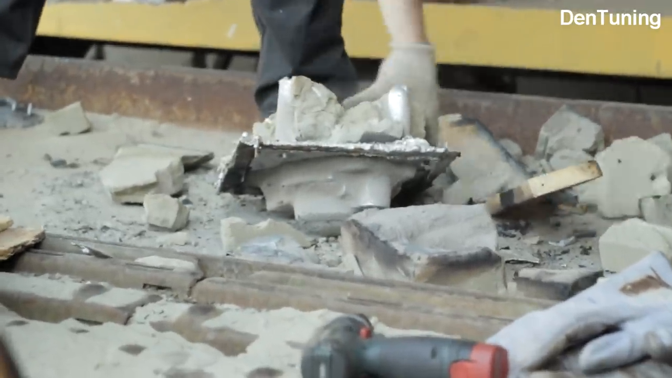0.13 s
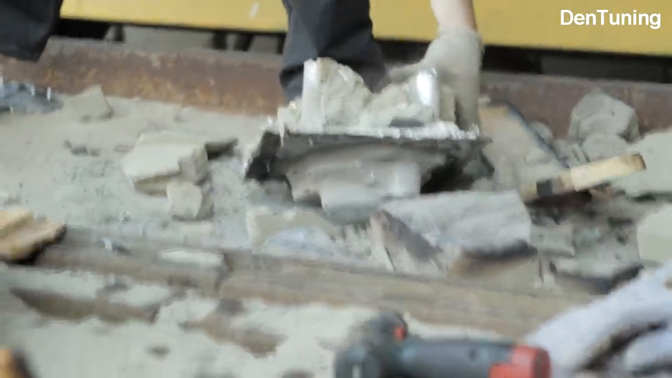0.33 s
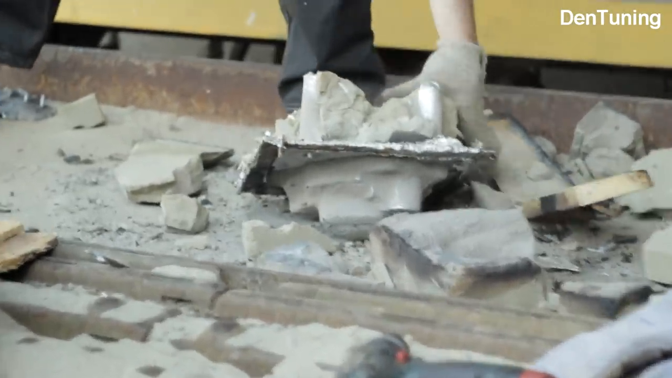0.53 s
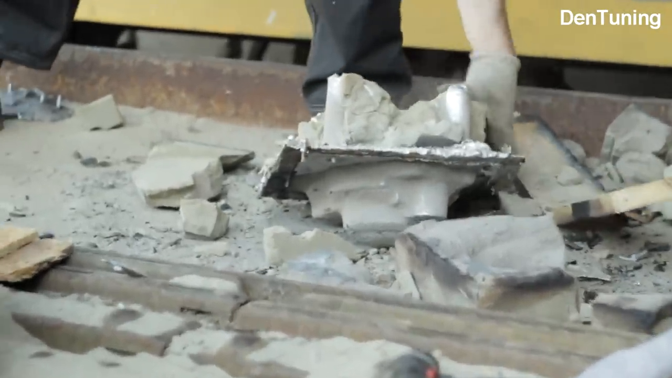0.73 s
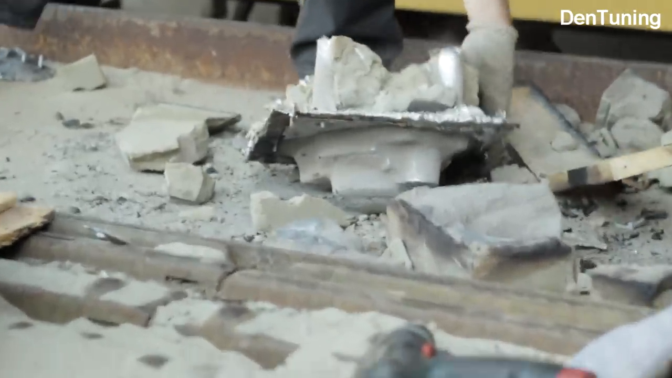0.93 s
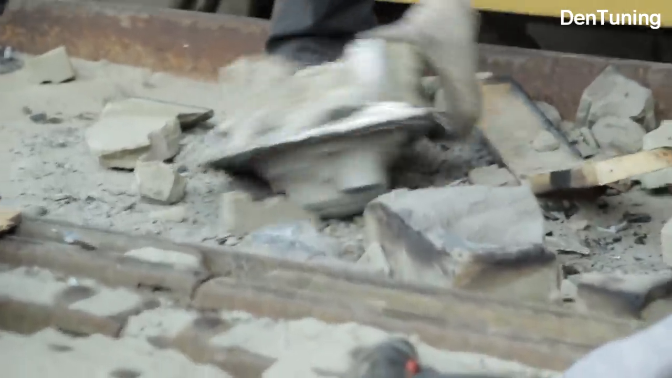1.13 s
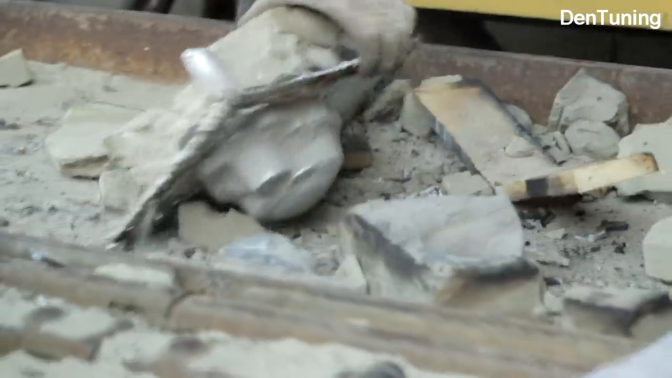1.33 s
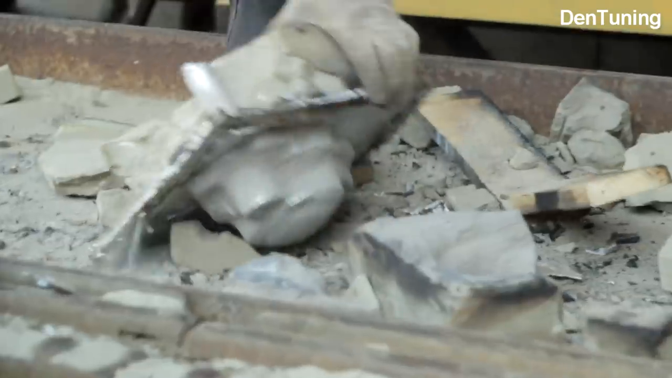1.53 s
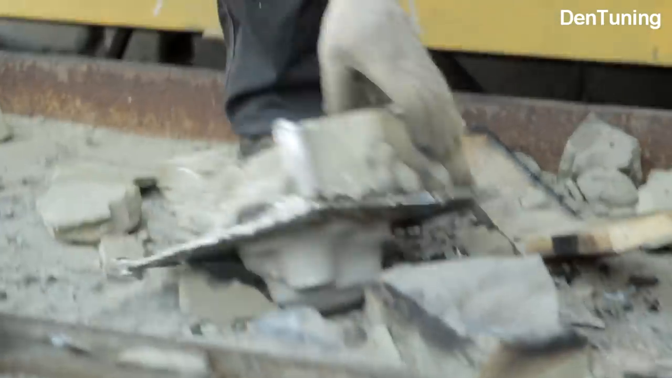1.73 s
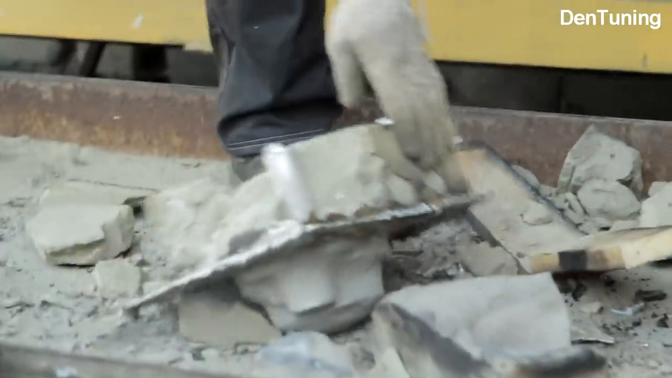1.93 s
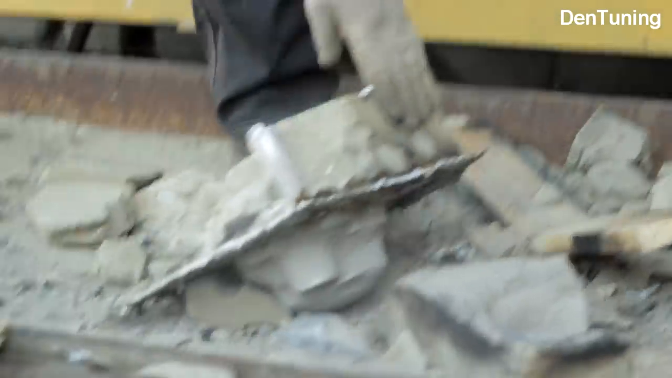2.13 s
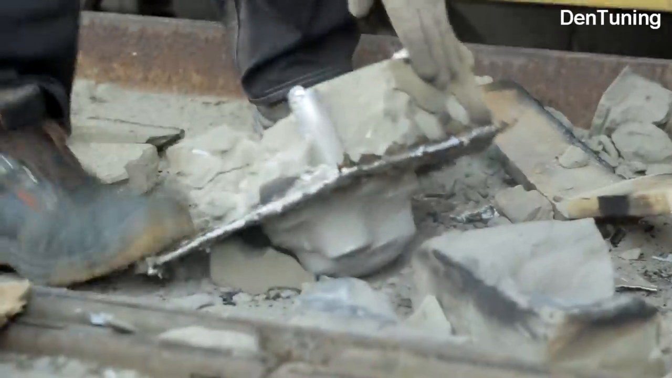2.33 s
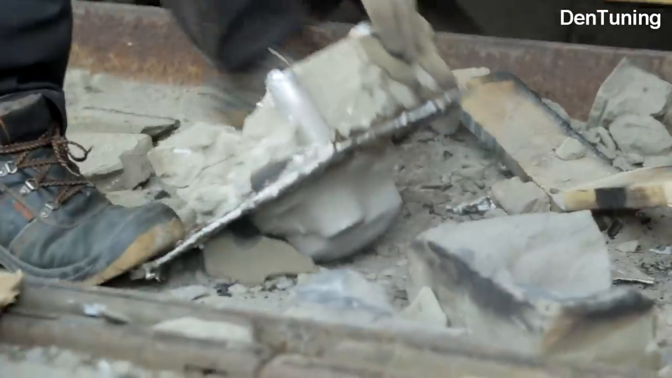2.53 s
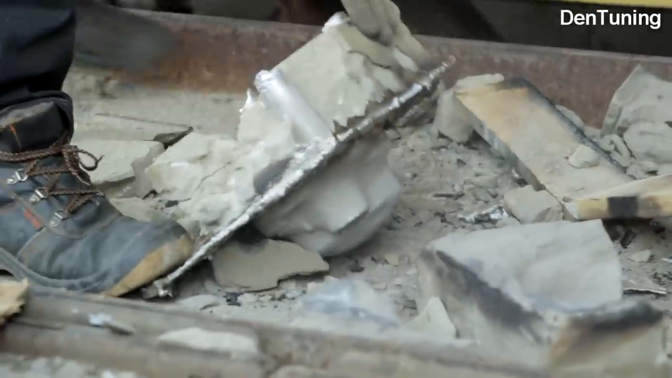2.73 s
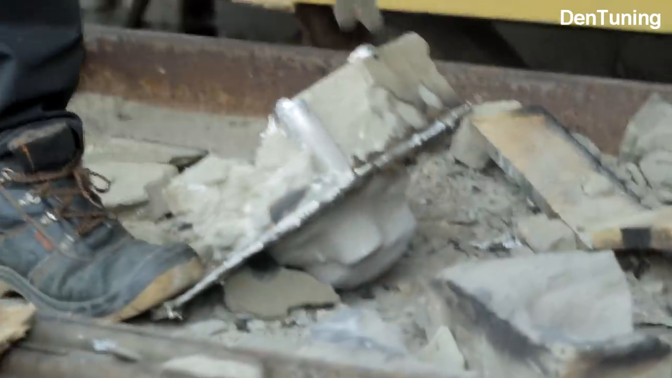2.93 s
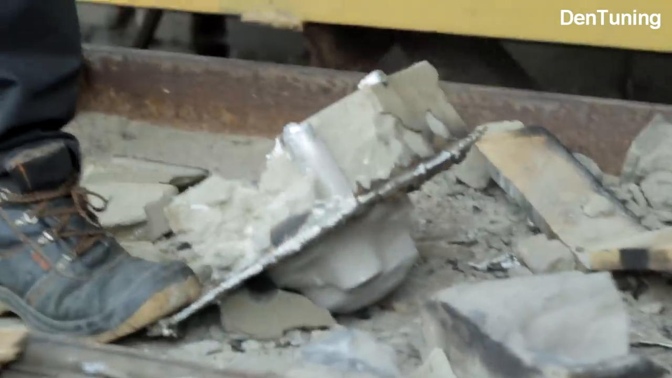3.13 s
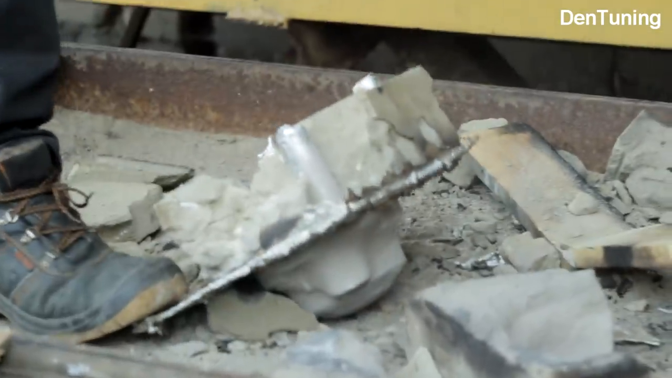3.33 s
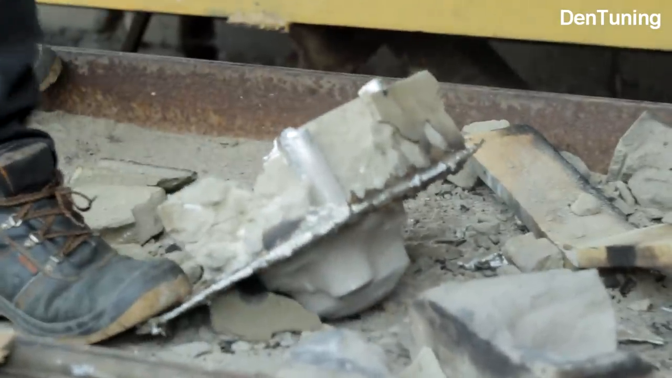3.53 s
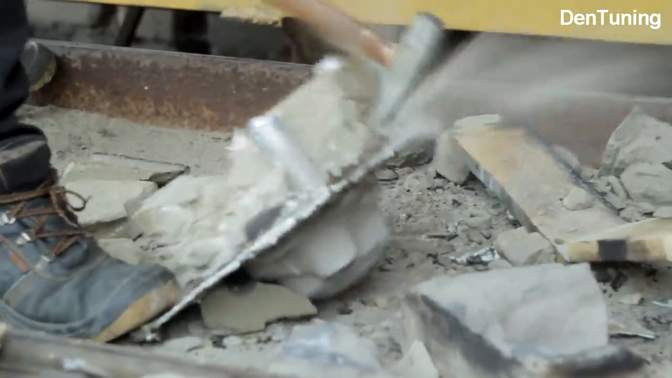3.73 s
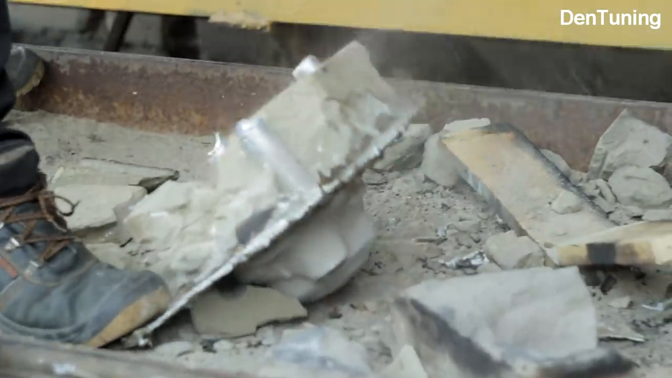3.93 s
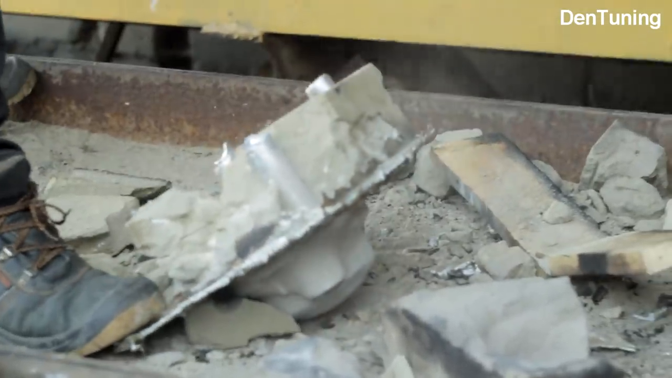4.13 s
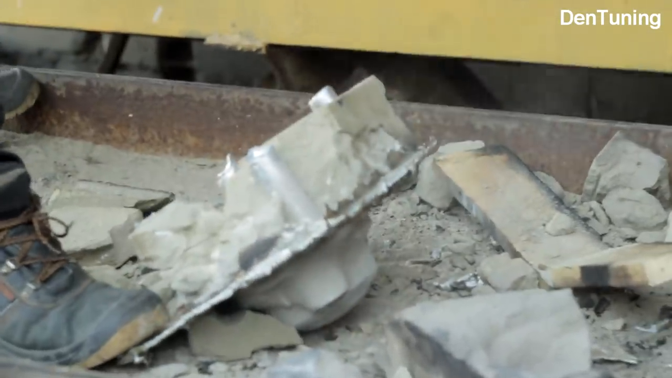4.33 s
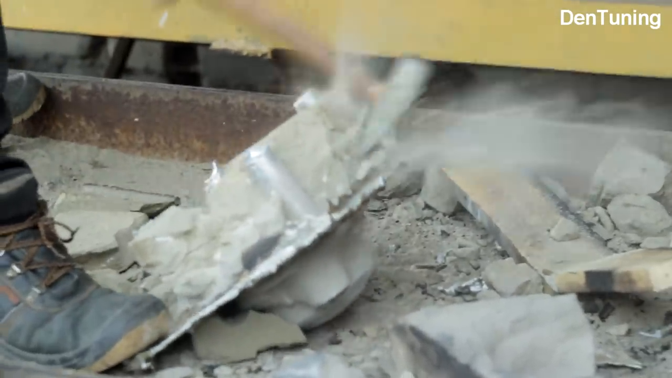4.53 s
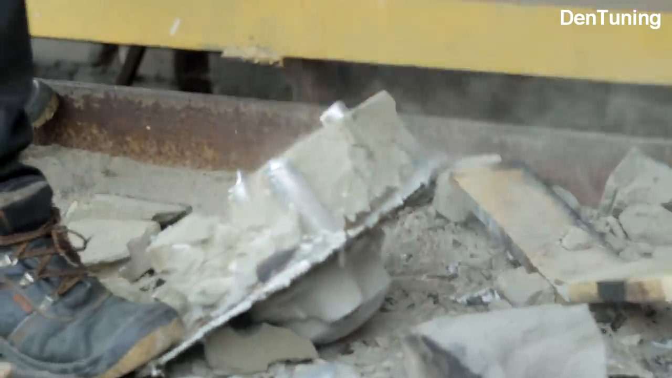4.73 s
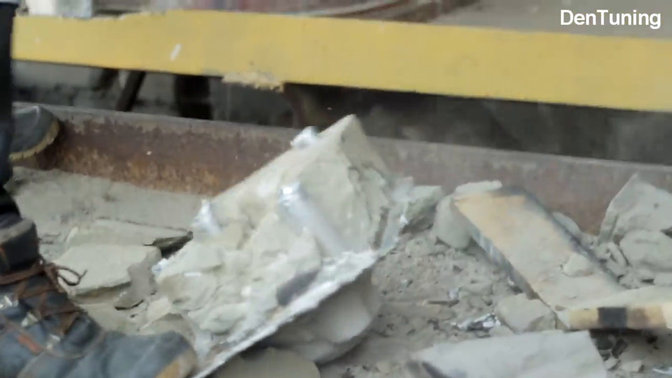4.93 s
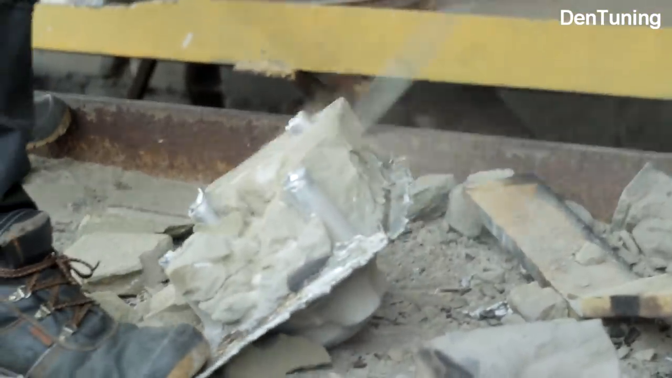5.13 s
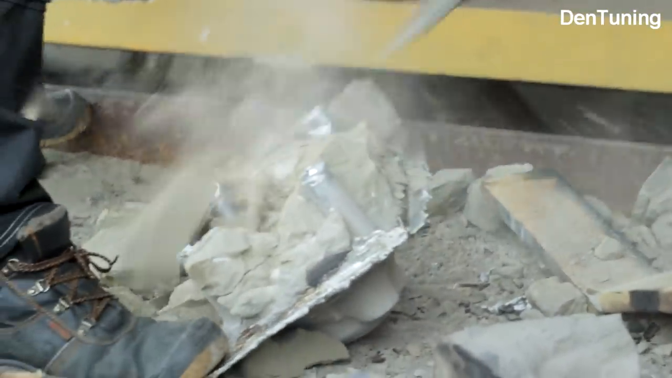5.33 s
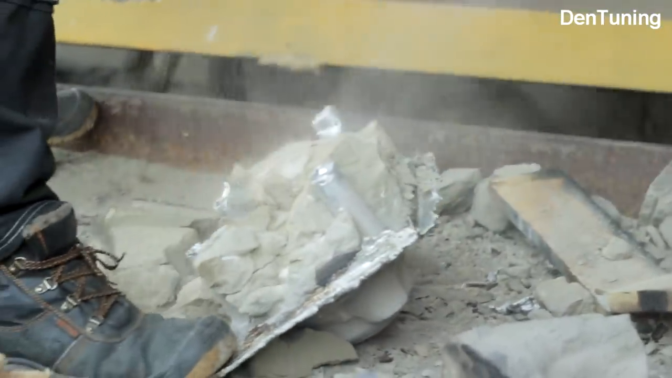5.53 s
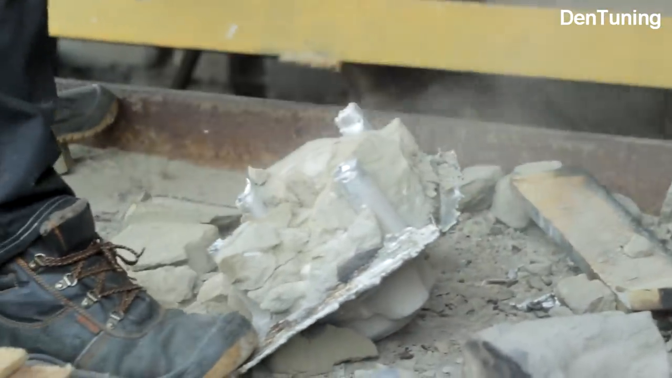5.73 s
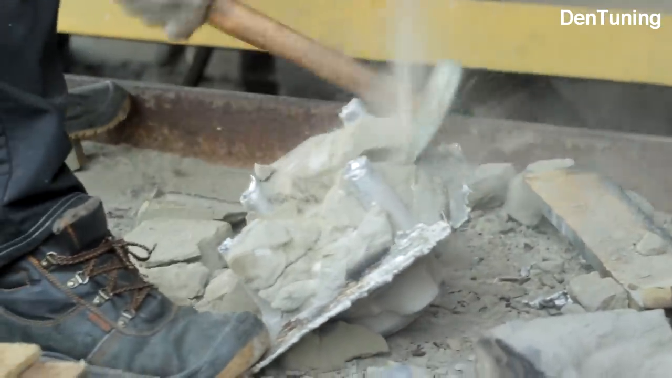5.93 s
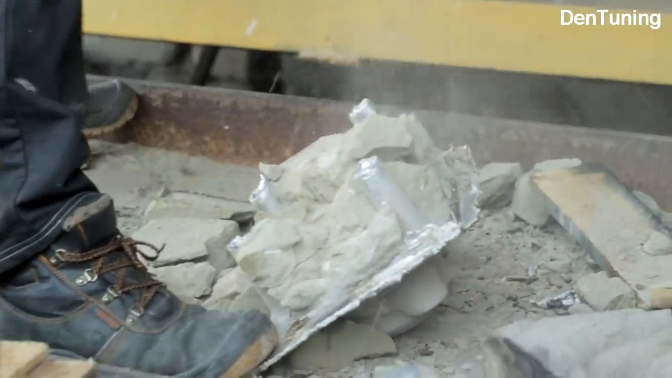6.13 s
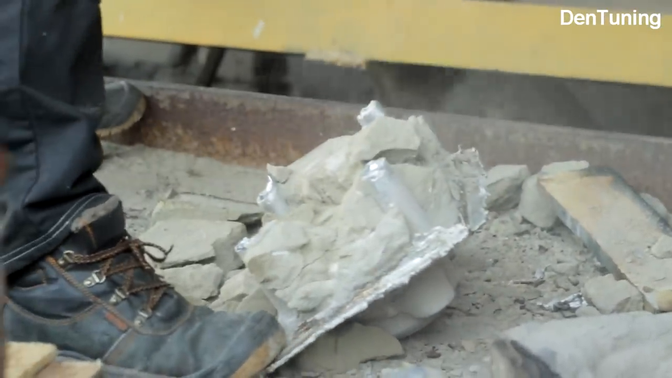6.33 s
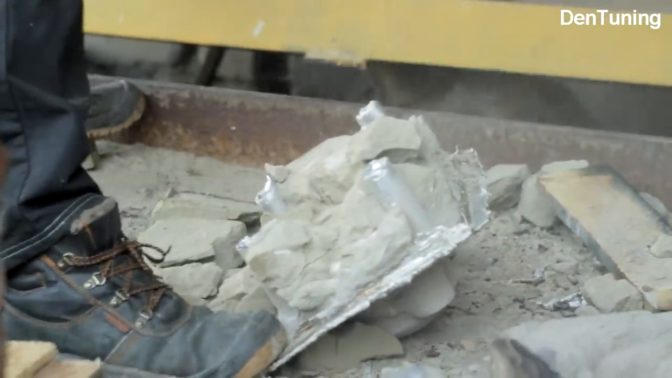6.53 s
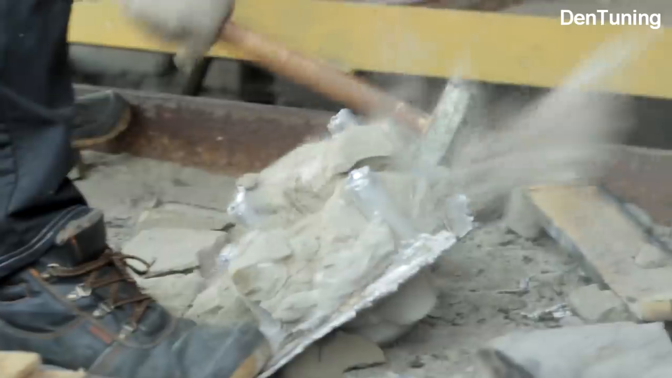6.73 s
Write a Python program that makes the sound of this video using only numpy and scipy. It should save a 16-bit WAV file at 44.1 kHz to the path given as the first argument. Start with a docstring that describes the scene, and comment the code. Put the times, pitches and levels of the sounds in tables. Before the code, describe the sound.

Gritty scraping and stony knocks, a short lull, then five spaced hammer thuds with bursts of crushed sand, ticking chips and yard echoes.

```python
"""Hammering a casting out of its sand mould

A metal casting in its hardened sand mould is tipped over on gritty ground, then struck five times with a hammer.
Each blow is a burst of crushed sand, a low thud and ringing modes, with echoes from the steel and walls of a yard.
Grinding sums filtered random grains; lumps, chips and the casting's rim knock as clicks with dying sines.
Soft deep bumps, one swish of cloth and steady background noise complete the scene."""
import sys
import numpy as np
from scipy import signal
from scipy.io import wavfile

SR = 44100
rng = np.random.default_rng(int(sys.argv[2]) if len(sys.argv) > 2 else 0)


def inscribe(sig):
    """Save sig as 16-bit PCM at rate SR to the path in sys.argv[1].

    A 1-D sig is mono; a 2-D sig holds one channel per row.
    Samples are clipped to [-1, 1] before scaling.
    """
    pcm = np.round(np.clip(np.atleast_2d(sig).T, -1, 1) * 32767)
    wavfile.write(sys.argv[1], SR, pcm.astype(np.int16))


N = 298998
EDGE_HZ = 16000  # upper band limit


def amp(db):
    """Level law: decibels become a linear gain."""
    return 10 ** (np.asarray(db) / 20)


def evened(x):
    """Power normalization: scales a signal to rms 1."""
    return x / np.sqrt(np.mean(x ** 2) + 1e-20)


def read(points, hz):
    """Logarithmic frequency scale: interpolates (Hz, value) points along it."""
    f, value = np.transpose(points)
    return np.interp(np.log(hz + 1), np.log(f + 1), value)


def add(mix, s, sound):
    """Superposition: adds a sound into the mix at time s."""
    part = mix[max(round(s * SR), 0):][:len(sound)]
    part += sound[:len(part)]


def pulse(*spectra, size=4096):
    """Minimum phase: the most compact causal click with the summed (Hz, dB) spectra."""
    hz = abs(np.fft.fftfreq(size, 1 / SR))
    log_gain = np.log(amp(sum(read(points, hz) for points in spectra)))
    # the Hilbert transform of the log gain gives the phase
    spectrum = np.exp(np.conj(signal.hilbert(log_gain)))
    return np.fft.ifft(spectrum).real[:size // 2]


def ring(modes, t):
    """Modal superposition: (Hz, dB, t60 s) modes die exponentially, each from a random phase."""
    return sum(amp(db - 60 * t / t60) * np.sin(2 * np.pi * (hz * t + rng.random()))
               for hz, db, t60 in modes)


def uneven(depth_db, count=34):
    """Random fracture: a hilly spectrum above the bass, since no two lumps break alike."""
    hills_db = depth_db * rng.standard_normal(count)
    hills_db = hills_db * (np.arange(count) > 0)  # the lowest point stays level
    return list(zip(np.geomspace(350, 16000, count), hills_db))


def grains(per_s, spread_db, count):
    """Shot noise: clicks at random times and signs, most small and a few large."""
    at = rng.integers(0, count, round(per_s * count / SR))
    size = amp(spread_db * np.minimum(rng.exponential(1, len(at)), 4))
    return np.bincount(at, size * rng.choice([-1, 1], len(at)), count)


def crumble(fade):
    """Granular fracture: a dense burst of energy 1, fading with a time constant in s."""
    burst = grains(per_s=6000, spread_db=3, count=SR) * np.exp(-np.arange(SR) / SR / fade)
    # grains are too small to radiate bass
    burst = signal.sosfilt(signal.butter(2, 700, "high", fs=SR, output="sos"), burst)
    return burst / np.linalg.norm(burst)


def tail(t60s, rise, size=256):
    """Diffuse reverberation: noise of energy 1 builds up, then dies at a rate set by frequency."""
    hz, t, z = signal.stft(rng.standard_normal(SR), SR, nperseg=size)
    fall_db = -60 * t / read(t60s, hz)[:, None]
    x = signal.istft(z * amp(fall_db), SR, nperseg=size)[1][:SR]
    x *= 1 - np.exp(-np.arange(SR) / SR / rise)
    return x / np.linalg.norm(x)


# Reflections from near surfaces: nominal delay_s, relative gain [ratio]
ECHOES = [(.0064, 0.5), (0.0103, 0.23), (0.014, -0.23), (.0173, 0.23), (.0266, .32), (.0336, .27)]
# Decay of the scatter from nearby stock: frequency_hz, t60_s
NEAR_T60 = [(100, 0.49), (300, 0.45), (1000, 0.31), (3000, 0.25), (7000, 0.24), (15000, 0.16)]
# Decay of the long tail of the yard: frequency_hz, t60_s
FAR_T60 = [(100, 1.52), (400, 0.75), (2000, 0.8), (6000, 0.67), (15000, 0.81)]


def yard(echo_db, near_db, far_db):
    """Impulse response: direct sound, single echoes, scatter from nearby stock and a long tail."""
    near = amp(near_db) * tail(NEAR_T60, rise=0.0092)
    far = amp(far_db) * tail(FAR_T60, rise=0.023)
    response = near + far
    response[0] += 1
    for s, gain in ECHOES:
        echo = amp(echo_db) * gain * np.array([1, 2, 1]) / 4  # slightly dulled
        add(response, s * rng.normal(1, .012), echo)
    return response


# Spectrum of the background: frequency_hz, relative level_db
AIR = [(20, 0.5), (50, -8), (120, -9), (400, -6.5), (850, -11), (1500, -12), (5000, -21.5), (15500, -28)]
AIR_DB = -71.5  # rms level


def air():
    """Stationary noise: a quiet background of constant power and fixed colour."""
    noise = signal.fftconvolve(rng.standard_normal(N), pulse(AIR))[:N]
    return amp(AIR_DB) * evened(noise)


PATCH_S, PATCH_DB = .03, 2.5  # spacing of the random gain points; their standard deviation


def clusters(count=500):
    """Random modulation: crumbs of neighbouring sizes come and go in clusters."""
    gain = amp(PATCH_DB * rng.standard_normal(count))
    return np.interp(np.arange(N) / SR, np.arange(count) * PATCH_S, gain)


# Spectrum of the larger bursting grains: frequency_hz, relative level_db
CRACKLE_COLOUR = [(100, -18), (500, -9), (1300, 2.5), (2500, -7), (6000, -13), (15000, -22.5)]
CRACKLE_PER_S, CRACKLE_SPREAD_DB = 160, 3  # bursts per second; scale of their size range


def crackle(per_s, count=8):
    """Filtered shot noise: larger grains burst with sharp clicks, each kind in its own colour."""
    total = np.zeros(N)
    for _ in range(count):
        bursts = grains(per_s / count, CRACKLE_SPREAD_DB, count=N)
        colour = pulse(CRACKLE_COLOUR, uneven(depth_db=5.5))
        total += signal.oaconvolve(bursts, colour)[:N]
    return evened(signal.oaconvolve(total, yard(echo_db=-13, near_db=-11, far_db=-12))[:N])


# The casting grinding over grit, or loose sand sliding:
# start_s, rise_s, hold_s, fade_db_per_s, relative level_db,
# coarse_db and fine_db (crumbs relative to the medium ones)
GRINDS = [(0.0, 0.007, 0.022, 80, -55, -3, -15), (0.263, 0.0092, 0.013, 116, -66.5, 3.5, -0.5),
          (0.537, .01, 0.033, 73, -69.5, -0.5, -9), (0.798, 0.064, 0.016, 139, -70, -4, -23),
          (1.136, 0.1, 0.18, 139, -48, -3, -9), (1.332, 0.048, 0.13, 149, -52.5, 8.5, -9.5),
          (1.547, 0.16, 0.06, 118, -50, 0, -11.5), (1.885, 0.045, 0.048, 60, -67, -3, -0.5),
          (1.997, 0.013, 0.024, 99, -61, 3, -3), (2.082, 0.042, 0.016, 169, -52, 3, -9),
          (2.182, 0.042, 0.14, 100, -63.5, 4, -9.5), (2.381, 0.013, 0.066, 150, -53.5, -15, -3.5),
          (2.416, 0.043, 0.088, 123, -50.5, -0.5, -10), (2.609, 0.034, 0.047, 104, -58, 3.5, -9),
          (2.886, 0.024, 0.037, 67, -61.5, -2.5, -8), (3.086, 0.078, .1, 92, -70.5, -21, -4),
          (3.265, 0.063, .03, 101, -59.5, -10, -2), (3.435, 0.029, 0.0066, 164, -70, 6.5, 3),
          (3.666, 0.053, 0.056, 80, -69.5, 3.5, -14), (4.016, 0.044, 0.06, 39, -64, -15, -4),
          (4.669, 0.065, 0.025, 92, -59.5, -10, -6), (4.838, 0.018, .1, 118, -57, -1.5, -4.5),
          (4.869, 0.16, 0.033, 162, -46.5, -7, -9.5), (5.136, .05, 0.063, 80, -61, -1, -8.5),
          (5.308, 0.047, 0.018, 44, -53.5, -5, -6), (5.458, .012, .03, 220, -59, 2, -23),
          (5.567, 0.034, 0.011, 130, -54, 9, -4.5)]
ONSET_DB = -19.5  # a grind swells from this far under its full level


def grind_levels():
    """Envelope and power addition: each grind swells, holds and dies; overlapping powers add."""
    t, power = np.arange(N) / SR, np.zeros((3, N))
    for s, rise, hold, fade, db, coarse_db, fine_db in GRINDS:
        swell_db = ONSET_DB * np.maximum(1 - (t - s) / rise, 0)
        fade_db = fade * np.maximum(t - s - rise - hold, 0)
        level = amp(np.maximum(db + swell_db - fade_db, -120))
        power += np.outer(amp([coarse_db, 0, fine_db]), level) ** 2
    return np.sqrt(power)


# Centres of the coarse, medium and fine crumb grades: pitch_hz
GRAIN_BANDS_HZ = [330, 1300, 6000]
# Balance of the crumb sizes: pitch_hz, relative level_db per grain size
GRAIN_COLOUR = [(100, -7), (150, -0.5), (200, 3.5), (280, -3.5), (450, -0.5), (650, 5.5), (1300, 4.5),
                (2200, 4), (3000, -4.5), (3700, -5.5), (5000, -8.5), (8000, -14), (15000, -23.5)]
# Lumps and the casting's rim knocking on the ground, also the moments before which grinding weakens:
# start_s, relative level_db, bass_db (extra bass from the weight), pitch_hz
KNOCKS = [(0.008, -45, -4, 1318), (0.024, -44, -4, 634), (0.55, -65, -13, 1004), (1.2438, -52.5, -26, 2070),
          (1.2741, -43.5, -32, 1074), (1.3113, -43, -30, 1233), (1.367, -54.5, 3, 2140),
          (1.401, -61, 15, 650), (1.4465, -44, -16, 1230), (1.52, -44.5, -9, 1190), (1.712, -59, 3.5, 4060),
          (1.7404, -55.5, 1.5, 850), (2.006, -52.5, -30, 1390), (2.108, -55, -13, 2330),
          (2.39, -61, 2, 2270), (2.531, -51.5, -6.5, 1155), (3.291, -57, -17, 1180),
          (3.323, -55, -31, 1284), (3.482, -48.5, -43, 1250), (3.489, -60, -16, 2290),
          (3.663, -58, -18, 1250), (3.677, -56, -30, 1220), (3.727, -65, -11, 1750),
          (4.241, -58, -21, 2090), (4.788, -57.5, -17, 2083), (5.462, -50.5, 4.5, 752),
          (5.485, -49, 2, 620), (5.593, -62.5, 15, 584), (5.627, -49, -6.5, 1140), (5.664, -59.5, 14, 655),
          (5.935, -59.5, -11, 2940), (6.741, -57, -8, 860)]
GRIT_SPREAD_DB = 5  # scale of the crumb strengths within one size
CRACKLE_DB = -6.5  # larger grains, relative to the medium crumbs


def grinding(count=110, size=5):
    """Stick-slip friction: crumbs of many sizes snap under the casting, each with a short ring."""
    crumbs = np.zeros((3, N))  # coarse, medium and fine
    for group in np.geomspace(110, 15000, count).reshape(-1, size):
        cluster = clusters()
        for hz in group:
            cycles = read([(150, 2.2), (1200, 3), (8000, 6)], hz)  # decay time in periods
            age = np.arange(int(6 * cycles * SR / hz)) / SR
            envelope = np.exp(-age * hz / cycles) * (1 - np.exp(-age * hz))
            snap = np.sin(2 * np.pi * hz * age) * envelope
            train = cluster * grains(per_s=85, spread_db=GRIT_SPREAD_DB, count=N)
            grade = np.argmin(abs(np.log(hz / np.array(GRAIN_BANDS_HZ))))
            crumbs[grade] += amp(read(GRAIN_COLOUR, hz)) * evened(signal.oaconvolve(train, snap)[:N])
    levels = grind_levels()
    out = amp(CRACKLE_DB) * levels[1] * crackle(CRACKLE_PER_S)
    for level, sound in zip(levels, crumbs):
        reflected = signal.oaconvolve(sound, yard(echo_db=-1, near_db=2.5, far_db=-9))[:N]
        out += level * evened(reflected)
    # stick and slip: the grinding weakens over the 20 ms before each knock
    stall = np.zeros(N)
    for when, *_ in KNOCKS:
        add(stall, when - .02, np.linspace(0, 1, SR // 50))
    return amp(-2.5) * out * amp(-5 * np.minimum(stall, 1))


# Modes of a lump: frequency ratio [multiple of its pitch], relative level_db, t60_s at a pitch of 1200 Hz
LUMP = [(1.001, 3, 0.12), (1.47, -1, 0.08), (1.86, -7, 0.044), (2.43, -12, 0.04)]


def lump(hz):
    """Scaling of modes: frequencies follow the lump's pitch, and small lumps die sooner."""
    return [(hz * k, db, t60 * (1200 / hz) ** 0.34) for k, db, t60 in LUMP if hz * k < EDGE_HZ]


# Modes of the casting on its bed: nominal pitch_hz, relative level_db, t60_s
CASTING = [(130.8, -13, 1), (149.7, 0, 0.33), (171.7, 3.5, 0.21), (193, 1.5, 0.3), (267.3, -2.5, 0.47),
           (325, -1.5, 0.35), (377.7, 2.5, 0.23), (460, -28, 0.28), (517, 11, 0.094), (558, -7.5, 0.33),
           (614, 1.5, 0.3), (652, 7, 0.25), (791, -5, 0.48), (891, -1, 0.18), (1181, -5.5, 0.4),
           (1360, -38, 0.09), (1652, 13.5, 0.033), (1860, -6, 0.051), (2611, -33, 0.1), (3060, -7, 0.26),
           (3340, 2, 0.079)]
# Bass, middle and treble points of a knock's force: frequency_hz
KNOCK_BANDS_HZ = [550, 1220, 3900]
# Spectrum shared by all knocks: frequency_hz, relative level_db
KNOCK_COLOUR = [(40, -41), (100, -12), (160, -4), (350, -2), (700, 0.5), (1300, -7), (2500, -6.5),
                (4000, -9.5), (8000, -21), (16000, -28)]
# smaller, higher lumps click brighter: treble at the reference pitch, and its rise with pitch
KNOCK_TREBLE_DB, TREBLE_DB_PER_OCTAVE, LUMP_HZ = -9, 10, 1260


def knocks():
    """Impact excitation: a lump clicks, rings briefly, crumbles a little and jars the casting."""
    out, t = np.zeros(N), np.arange(SR // 3) / SR
    for s, strength_db, weight_db, hz in KNOCKS:
        treble_db = KNOCK_TREBLE_DB + TREBLE_DB_PER_OCTAVE * np.log2(hz / LUMP_HZ)
        force = list(zip(KNOCK_BANDS_HZ, strength_db + np.array([weight_db, 0, treble_db])))
        contact = yard(echo_db=-39, near_db=1.0, far_db=-6.5) + amp(-6.5) * crumble(fade=0.01)
        click = pulse(KNOCK_COLOUR, force, uneven(depth_db=5.5))
        add(out, s, amp(37) * signal.fftconvolve(contact, click))
        struck = [(f, db + read(force, f), t60) for f, db, t60 in lump(hz)]
        add(out, s, amp(-3.5) * ring(struck, t))
        jarred = [(f, db + read(force, f), t60) for f, db, t60 in CASTING]
        add(out, s, amp(-10) * ring(jarred, t))
    return out


# Soft bumps of weight on the ground: start_s (time of the peak), level_db (rms before the envelope)
BUMPS = [(0.597, -65.5), (1.589, -60), (1.662, -59), (1.763, -58), (4.49, -63)]
# Spectrum of a bump: frequency_hz, relative level_db
BUMP_COLOUR = [(20, 2), (45, 6), (70, 11.5), (110, -7.5), (300, -49), (1000, -90)]
BUMP_S = 0.029  # half length, where the envelope has fallen to 1/e


def bumps():
    """Low-frequency loading: weight settles as deep noise under a Gaussian envelope."""
    out, t = np.zeros(N), np.arange(-SR // 8, SR // 8) / SR
    for s, db in BUMPS:
        deep = signal.fftconvolve(rng.standard_normal(SR), pulse(BUMP_COLOUR))
        push = evened(deep[-SR // 2:][:len(t)]) * np.exp(-(t / BUMP_S) ** 2)
        add(out, s + t[0], amp(db) * push)
    return out


THUD_OCTAVES, BASS_DB_PER_OCTAVE = 0.58, 4  # width of the thud; fall below it
TILT_FROM_HZ = 504  # the sand cushions the blow above this


def blow_force(db, thud_hz, thud_db, tilt_db, count=40):
    """Contact force spectrum: a low hump in (Hz, dB), and a treble that the sand cushions."""
    hz = np.geomspace(60, 6000, count)
    octaves = np.log2(hz / thud_hz)
    hump_db = thud_db * np.exp(-(octaves / THUD_OCTAVES) ** 2)
    bass_db = BASS_DB_PER_OCTAVE * np.minimum(octaves, 0)
    treble_db = tilt_db * np.maximum(np.log2(hz / TILT_FROM_HZ), 0)
    return list(zip(hz, db + hump_db + bass_db + treble_db))


# Hammer blows: start_s, relative level_db, thud pitch_hz, thud boost_db, treble tilt_db_per_octave,
# first crack_db (relative), head ring_db (relative)
BLOWS = [(3.7885, -36, 181, 8, -3, -18, -48), (4.5379, -37.5, 149.6, 2.5, -2.0, 4, -64),
         (5.2427, -35, 170.4, 6.5, -4, 0, -44.5), (5.9863, -33.5, 260.6, 4.5, -3.5, -12, -50),
         (6.7587, -35, 186, -0.5, -5, -4.5, -53)]
# Spectrum shared by all blows: frequency_hz, relative level_db
BLOW_COLOUR = [(30, -53.5), (70, -9.5), (110, -6), (170, -6.5), (290, -7), (570, -1), (1050, -4.5),
               (1950, -6.5), (3400, -8.5), (4500, -14.5), (6000, -16), (10000, -26.5), (16000, -31.5)]
# Modes of the steel hammer head: nominal pitch_hz, relative level_db, t60_s
HAMMER = [(10630, -9, .17), (13110, -11, 0.07)]
THUD_T60, THUD_RISE_S, BOUNCE_DB = 0.19, 0.018, -4  # s; s; dB: the casting bouncing on its bed of sand
RESEAT = 0.0124  # each blow reseats the casting and shifts its modes by about this share


def blows():
    """Impact on a cushioned body: sand crunches, the casting thuds and rings, the head pings."""
    out, t = np.zeros(N), np.arange(SR) / SR
    for s, strength_db, thud_hz, thud_db, tilt_db, crack_db, head_db in BLOWS:
        force = blow_force(strength_db, thud_hz, thud_db, tilt_db)
        contact = yard(echo_db=-8, near_db=7.0, far_db=-0.5) + amp(7.0) * crumble(fade=0.0076)
        contact[0] += amp(crack_db)  # a square hit starts with a sharper crack
        # a second, shorter crunch follows 14 ms later, like a secondary echo
        add(contact, .014, amp(-1) * crumble(fade=0.0023))
        colour = pulse(BLOW_COLOUR, force, uneven(depth_db=1.5))
        add(out, s, amp(42.5) * signal.fftconvolve(contact, colour))
        struck = [(hz * rng.normal(1, RESEAT), db + read(force, hz), t60) for hz, db, t60 in CASTING]
        add(out, s, amp(-2.5) * ring(struck, t) * (1 - np.exp(-t / 0.005)))
        bounce = ring([(thud_hz, strength_db + thud_db + BOUNCE_DB, THUD_T60)], t)
        add(out, s, amp(6) * bounce * (1 - np.exp(-t / THUD_RISE_S)))
        head = ring([(hz * rng.normal(1, 0.0016), db, t60) for hz, db, t60 in HAMMER], t)
        reflected = signal.fftconvolve(head, yard(echo_db=2, near_db=-17, far_db=-7))
        add(out, s, amp(head_db) * reflected)
    return out


# Flying chips that land: start_s, relative level_db, pitch_hz
CHIPS = [(3.954, -63.5, 9000), (4.085, -69, 12000), (4.154, -51, 5900), (4.2196, -58.5, 6520),
         (4.244, -54, 3910), (4.417, -66, 10900), (5.363, -57, 7650), (5.8168, -70.5, 6900)]


def chips():
    """Small-body impact: hard bits land with a high tick, a little crumbling and a ping."""
    out, t = np.zeros(N), np.arange(SR) / SR
    for s, db, hz in CHIPS:
        contact = yard(echo_db=10, near_db=1, far_db=-1) + amp(9.5) * crumble(fade=0.006)
        spectrum = [(hz / 9, -26), (hz / 2, -5), (hz, 0), (hz * 2, -8)]
        tick = pulse(spectrum, uneven(depth_db=-2.5))
        add(out, s, amp(db + 18.0) * signal.fftconvolve(contact, tick))
        add(out, s, amp(db - 5) * ring(lump(hz), t))
    return out


# Spectrum of rubbing cloth: frequency_hz, relative level_db
SLEEVE = [(100, 1), (400, 0.5), (900, 2.5), (2500, -2.5), (4000, -7.5), (8000, -13.5), (15000, -23)]


def sleeve():
    """Friction noise: cloth swishes faintly once, before the last blow, as the hammer is raised."""
    t = np.arange(N) / SR
    rub = evened(signal.fftconvolve(rng.standard_normal(N), pulse(SLEEVE))[:N])
    return amp(-59.5) * rub * np.exp(-((t - 6.575) / 0.083) ** 2)


def scene():
    """Superposition: the pressures of all sources add at one microphone."""
    return (blows() + knocks() + chips() + grinding() + sleeve() + bumps() + air())[None]


def record(dry):
    """Band limitation: a linear-phase low-pass filter sets the recorder's upper edge."""
    low_pass = signal.firwin(511, EDGE_HZ, window=("kaiser", 9), fs=SR)
    return signal.oaconvolve(dry, low_pass[None], "same")


dry = scene()
out = record(dry)
inscribe(out)
```